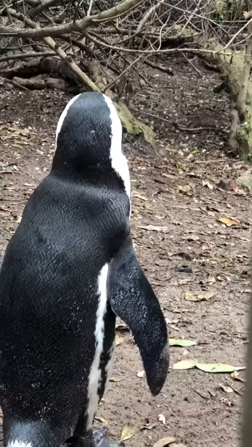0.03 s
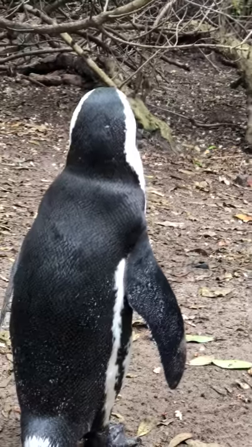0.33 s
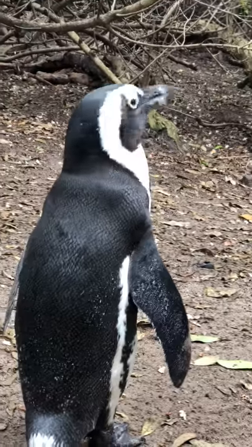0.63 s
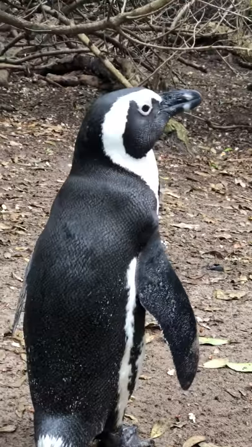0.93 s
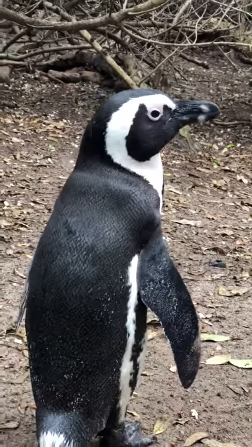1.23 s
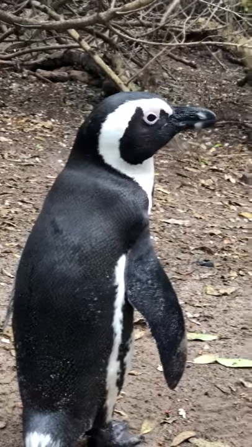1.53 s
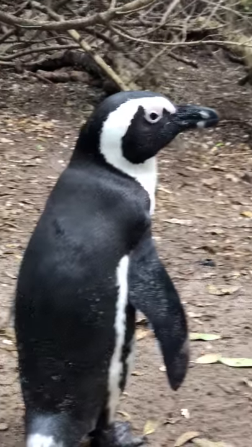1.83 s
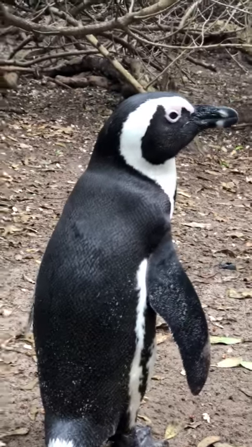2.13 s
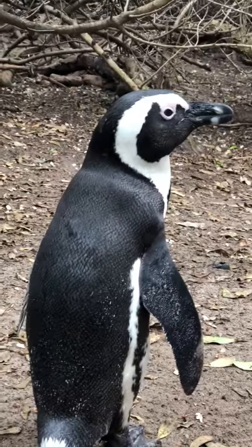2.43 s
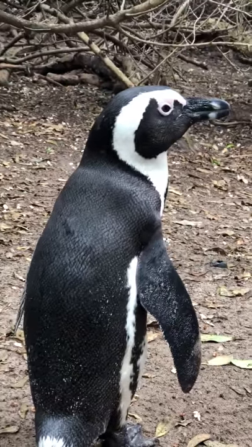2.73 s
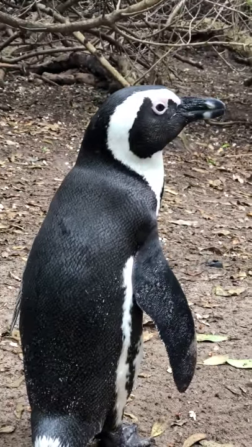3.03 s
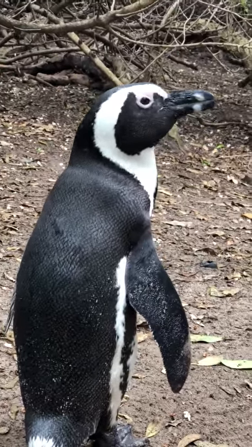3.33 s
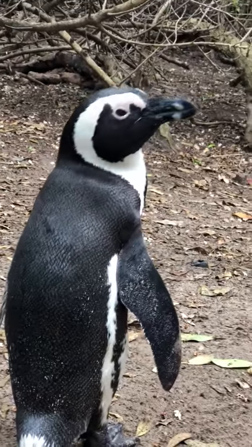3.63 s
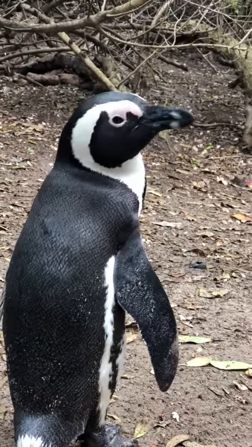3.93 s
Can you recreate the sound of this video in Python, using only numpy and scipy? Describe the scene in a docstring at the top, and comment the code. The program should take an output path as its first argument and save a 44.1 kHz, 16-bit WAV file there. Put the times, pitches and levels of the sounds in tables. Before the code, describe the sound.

Short, high, falling chirps come from a small bird near the microphone in a thicket: two at first, then eight in a row. Faint leaf crackles and soft bumps fill the pause, with distant birds and a low rumble behind.

```python
"""In a thicket, one microphone. Close by, a small bird repeats one chirp: two tiny ticks, a held
whistle, a flick and a fast downward sweep. A second bird slurs one whistle and others call from
far off; each note is a gliding, nearly pure tone scattered by the branches. Dry leaves tick and
rustle in bursts of noise, a few soft bumps sound on the ground, and a low rumble swells and fades."""
import sys
import numpy as np
from scipy import signal
from scipy.fft import rfft, irfft
from scipy.io import wavfile
from scipy.ndimage import map_coordinates

SR = 44100
rng = np.random.default_rng(int(sys.argv[2]) if len(sys.argv) > 2 else 0)


def file_out(sig):
    """Save sig as 16-bit WAV at sys.argv[1]."""
    # one column per channel
    cols = np.atleast_2d(sig).T
    # limit, then scale
    lim = np.clip(cols, -1, 1)
    pcm = np.round(lim * 32767).astype(np.int16)
    wavfile.write(sys.argv[1], SR, pcm)


N = 176400


def amp(db):
    """Decibels to gain."""
    return 10 ** (np.asarray(db) / 20)


def curve(rows):
    """One value per sample for each column after the time."""
    times, *columns = np.transpose(rows)
    return [np.interp(np.arange(N) / SR, times, column) for column in columns]


def wobble(rate):
    """A smooth random curve, rate knots a second."""
    return map_coordinates(rng.standard_normal(int(N * rate / SR) + 4), [np.arange(N) * rate / SR])


def noise(colour):
    """Noise of rms 1, coloured by rows of f/Hz, level/dB."""
    hz, db = np.transpose(colour)
    gain = amp(np.interp(np.log(np.fft.rfftfreq(N, 1 / SR) + 1), np.log(hz), db))
    x = irfft(rfft(rng.standard_normal(N)) * gain, N)
    return x / x.std()


def add(track, start_s, sound):
    """Mix a sound into the track."""
    part = track[max(0, round(start_s * SR)):][:len(sound)]
    part += sound[:len(part)]


def note(shape, scale=1, waver=.0029, flutter_db=-.78, second_db=-37, third_db=-34, edge_s=.0005):
    """An unsteady whistle with two faint overtones, along rows of t/s, pitch (x scale = Hz), level/dB."""
    times, pitch, db = np.transpose(shape)
    t = np.arange(times[0], times[-1], 1 / SR)
    drift, flutter = (map_coordinates(k, [(t - times[0]) * 400]) for k in rng.standard_normal((2, 128)))
    hz = scale * np.interp(t, times, pitch) * (1 + waver * drift)
    phase = 2 * np.pi * np.cumsum(hz) / SR
    edges = np.clip(np.minimum(t - times[0], times[-1] - t) / edge_s, 0, 1)
    overtones = amp(second_db) * np.sin(2 * phase) + amp(third_db) * np.sin(3 * phase)
    return edges * amp(np.interp(t, times, db) + flutter_db * flutter) * (np.sin(phase) + overtones)


def thicket(x, wet_db, t60, late_db=-25, late_t60=.72, direct_db=0, build_s=.0021):
    """The path to the microphone: direct sound, quick scatter from branches and a faint longer tail."""
    t = np.arange(SR // 2) / SR
    decay = amp(-60 * t / t60) + amp(late_db - 60 * t / late_t60)
    tail = rng.standard_normal(len(t)) * decay * (1 - np.exp(-t / build_s))
    response = amp(wet_db) * tail / np.linalg.norm(tail)
    response[0] += amp(direct_db)
    return signal.fftconvolve(x, response)


def contact(start_s, attack_s, t60):
    """Envelope of one contact, peak 1."""
    t = np.maximum(np.arange(N) / SR - start_s, 0)
    envelope = (1 - np.exp(-t / attack_s)) * amp(-60 * np.minimum(t / t60, 10))
    return envelope / envelope.max()


def background():
    """Distant rumble and airy wash swell together over a steady hiss and a thin, high whine."""
    swell = [(0.1, -58.5, -100), (0.13, -60, -60), (0.26, -59.5, -63), (0.9, -55.5, -60.5),
             (1.21, -57.5, -60.5), (1.86, -49.5, -55), (2.42, -50, -53.5), (2.74, -47.5, -53.5),
             (4.0, -55.5, -59)]  # t/s, rumble level/dB, wash level/dB, both before trim
    rumble_colour = [(20, -41), (30, -9), (40, -24), (52, -6.5), (65, 1), (82, 1), (100, -0.5), (150, 2),
                     (200, -3), (260, -12), (400, -17.5), (800, -79)]  # f/Hz, level/dB
    wash_colour = [(30, -36), (120, -9.5), (300, 4), (550, -0.5), (1000, -2.5), (2000, -11.5),
                   (4000, -15.5), (7000, -26), (16000, -50)]  # f/Hz, level/dB
    hiss_colour = [(60, 9), (300, 17), (4000, -2), (8000, -10.5), (13500, -13), (15300, -10), (17000, -9.5)]  # f/Hz, level/dB
    whine_fade = [(1.2, -100), (1.7, -77), (3.3, -77), (4, -84)]  # t/s, level/dB
    rumble_trim_db, wash_trim_db, hiss_db, whine_hz = 2, -.5, -62.5, 15690
    rumble_db, wash_db = curve(swell)
    rumble = amp(rumble_db + rumble_trim_db + .76 * wobble(14)) * noise(rumble_colour)
    wash = amp(wash_db + wash_trim_db + 1.2 * wobble(12)) * noise(wash_colour)
    whine = amp(curve(whine_fade)[0]) * np.sin(2 * np.pi * whine_hz * np.arange(N) / SR)
    return rumble + wash + amp(hiss_db) * noise(hiss_colour) + whine


def near_bird():
    """Close by, mostly direct: two ticks, a held whistle that flicks up, then the downward sweep."""
    # each chirp: sweep t/s, whistle gain/dB, sweep gain/dB, tick gain/dB, whistle f/Hz
    chirps = [(0.1266, -36.5, -31.5, -30, 5170), (.390, -37, -32, -31.5, 5100),
              (2.0551, -44.5, -38, -58, 5078), (2.3197, -42, -35, -39, 5110),
              (2.5805, -39.5, -34.5, -32.5, 5140), (2.8348, -36.5, -31.5, -30.5, 5120),
              (3.0888, -36.5, -31, -30, 5122), (3.3407, -37, -34, -34.5, 5130),
              (3.595, -39, -34.5, -34.5, 5137), (3.8492, -39.5, -32.5, -32.5, 5130)]
    whistle = [(-.076, 1.21, -19), (-.073, 1.14, -12), (-.069, 1.11, -16), (-.064, .985, -16),
               (-.056, 1.0, -11), (-.049, 1.012, -4.5), (-.035, 1.007, -1), (-.021, .994, -1.5),
               (-.013, 1.0, 5.5), (-.009, 1.02, 3.5), (-.007, 1.08, -1), (-.005, 1.14, -7),
               (-.003, 1.07, -14)]  # t/s from the sweep, ratio to the held pitch, relative level/dB
    # the quick glides: t/s from the sweep, f/Hz, relative level/dB
    up_tick = [(-.104, 3500, -22), (-.102, 4500, -14), (-.099, 5500, -22)]
    down_tick = [(-.085, 4700, -22), (-.083, 3600, -17), (-.080, 2600, -22)]
    sweep = [(-.002, 5300, -17), (0, 4650, -4), (.002, 4330, 4), (.005, 4000, -2.5), (.0075, 3780, -6),
             (.011, 3400, -9), (.013, 3000, -17), (.0155, 2650, -22)]
    out = np.zeros(N)
    for sweep_s, whistle_db, sweep_db, tick_db, hz in chirps:
        held = note(whistle, hz, waver=.008, flutter_db=1.5, second_db=-43, third_db=-32)
        add(out, sweep_s + whistle[0][0], amp(whistle_db) * thicket(held, wet_db=-5, t60=.22))
        for shape, db in ((up_tick, tick_db), (down_tick, tick_db), (sweep, sweep_db)):
            glide = note(shape, second_db=-52, third_db=-52)
            add(out, sweep_s + shape[0][0], amp(db) * thicket(glide, wet_db=-4.5, t60=.2, build_s=.002))
    return out


def dry_leaves():
    """Leaves and twigs snap in short, crackling bursts, with one fine, scratchy rustle."""
    snaps = [(0.112, -50.5, -64, 0.031), (0.349, -52, -66, 0.035), (0.74, -49.5, -68, 0.043),
             (0.757, -52.5, -59, 0.075), (.896, -71, -57.5, 0.075), (1.143, -73, -56.5, 0.037),
             (1.156, -47.5, -57, 0.03), (1.202, -45, -57, 0.023), (1.3, -73, -58.5, 0.042),
             (1.311, -62, -57.5, 0.026), (1.678, -44, -65, 0.026), (1.779, -54, -55.5, 0.037),
             (1.945, -76, -66, 0.045), (2.2229, -41.5, -43.5, 0.022), (2.729, -66, -64, .025),
             (3.044, -62, -60.5, 0.047), (3.624, -68, -62, 0.051), (3.657, -58, -63, 0.036),
             (3.707, -64, -58.5, 0.077), (3.766, -69, -61, 0.045), (3.786, -65, -60, .03)]  # t/s, body level/dB, crisp top level/dB, t60/s
    body_colour = [(100, -15), (500, 5), (1400, 1.5), (2300, -4.5), (3200, 3), (6000, -17), (16000, -30)]  # f/Hz, level/dB
    top_colour = [(300, -37), (3000, 6), (7000, 7), (12000, 2.5), (17000, 1.5)]  # f/Hz, level/dB
    rustle_fade = [(.3, -88), (.325, -67), (.345, -59), (.41, -73), (.55, -72), (.7, -65.5), (.76, -71),
                   (.83, -94)]  # t/s, level/dB
    rustle_colour = [(1000, -46), (6000, -7), (9500, -9), (12000, -2), (15500, -10), (17000, -10)]  # f/Hz, level/dB
    body, top = noise(body_colour), noise(top_colour)
    crackle = amp(1.77 * wobble(900))
    out = amp(curve(rustle_fade)[0] + 1.2 * wobble(150)) * noise(rustle_colour)
    for start_s, body_db, top_db, t60 in snaps:
        out += contact(start_s, attack_s=.0007, t60=t60) * (amp(body_db) * body + amp(top_db) * top)
    return crackle * out


def second_bird():
    """Another bird near the microphone slurs one whistle down and up again."""
    slur = [(.366, 5100, -50), (.38, 4450, -46), (.398, 4150, -40), (.41, 4240, -40), (.43, 4580, -42),
            (.45, 4710, -37), (.468, 4690, -38), (.485, 4500, -39), (.499, 4440, -37), (.505, 4480, -48),
            (.528, 4500, -44), (.545, 4510, -56)]  # t/s, f/Hz, level/dB
    out = np.zeros(N)
    whistle = note(slur, flutter_db=2.5, second_db=-46, third_db=-48)
    add(out, slur[0][0], thicket(whistle, wet_db=-7, t60=.26))
    return out


def squeak():
    """A faint, pure, very high squeak rises inside the rustle."""
    rise = [(.5, 11300, -76), (.525, 11800, -71), (.548, 12000, -62), (.565, 12700, -76), (.59, 13100, -75)]  # t/s, f/Hz, level/dB
    out = np.zeros(N)
    add(out, rise[0][0], note(rise, waver=.016, second_db=-100, third_db=-100))
    return out


def ground_bumps():
    """Soft bumps on the ground, each a low damped thud with a longer scuff of noise."""
    bumps = [(0.719, -38.5, -69), (.745, -36, -71), (0.808, -51, -45), (0.875, -59, -47)]  # t/s, thud level/dB, scuff level/dB
    scuff_colour = [(100, -15), (300, -0.5), (500, 7), (750, -11.5), (1200, -8.5), (2000, -23.5),
                    (6000, -52)]  # f/Hz, level/dB
    thud_hz = 137.6
    scuff = noise(scuff_colour)
    out = np.zeros(N)
    for start_s, thud_db, scuff_db in bumps:
        thud = np.sin(2 * np.pi * thud_hz * (np.arange(N) / SR - start_s))
        out += amp(thud_db) * contact(start_s, attack_s=.002, t60=.082) * thud
        out += amp(scuff_db) * contact(start_s, attack_s=.002, t60=.16) * scuff
    return out


def far_birds():
    """Far off, arriving mostly as echo: one raspy falling call, later a run of rising notes."""
    raspy_call = [(.874, 4210, -56), (.886, 4536, -56), (.9, 4130, -54.5), (.91, 3840, -61),
                  (.918, 3440, -53), (.928, 3430, -63)]  # t/s, f/Hz, level/dB
    rising_notes = [(2.17, -50), (2.345, -51), (2.524, -49.5), (2.73, -51.5), (2.934, -52), (3.13, -55)]  # t/s, gain/dB
    rising_shape = [(0, 3800, -8), (.015, 3640, -1), (.035, 3790, 0), (.06, 3940, 0), (.075, 3900, -9)]  # t/s into the note, f/Hz, relative level/dB
    far_path = dict(wet_db=0, t60=.26, direct_db=-9)
    out = np.zeros(N)
    add(out, raspy_call[0][0], thicket(note(raspy_call, waver=.08, flutter_db=3), **far_path))
    for start_s, db in rising_notes:
        add(out, start_s, amp(db) * thicket(note(rising_shape, waver=.018), **far_path))
    return out


def scene():
    """Everything at one microphone, in mono."""
    mix = background() + near_bird() + dry_leaves() + second_bird() + squeak()
    return (mix + ground_bumps() + far_birds())[None]


def record(dry):
    """The microphone opens after a moment and keeps nothing above its band limit."""
    open_s, top_hz = .0835, 17250
    opened = dry * (np.arange(N) / SR > open_s)
    return irfft(rfft(opened) * (np.fft.rfftfreq(N, 1 / SR) < top_hz), N)


dry = scene()
out = record(dry)
file_out(out)
```